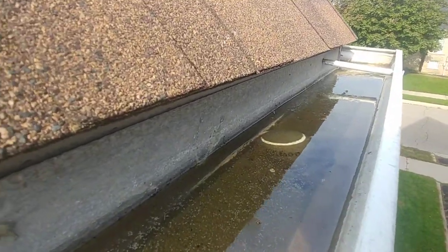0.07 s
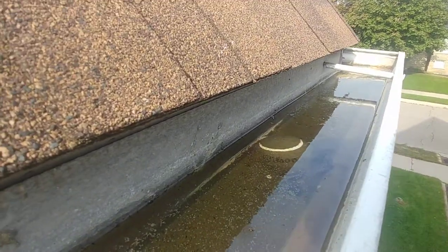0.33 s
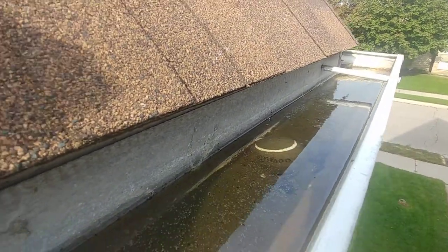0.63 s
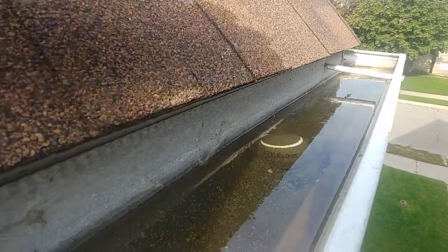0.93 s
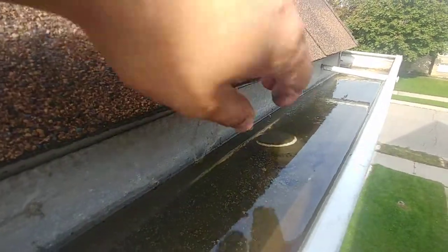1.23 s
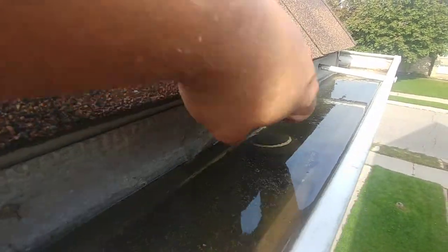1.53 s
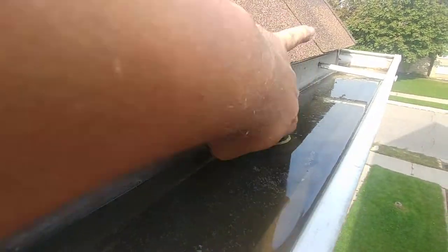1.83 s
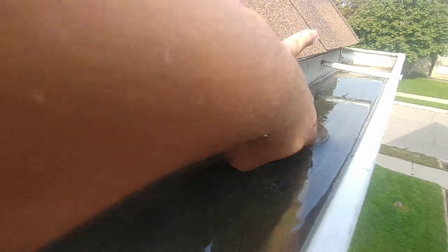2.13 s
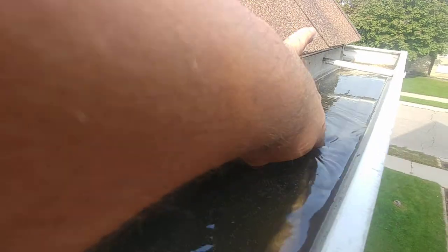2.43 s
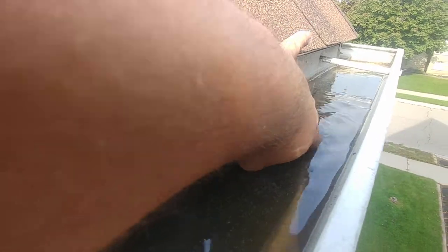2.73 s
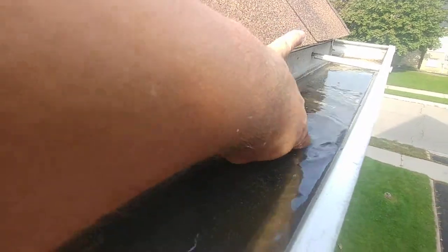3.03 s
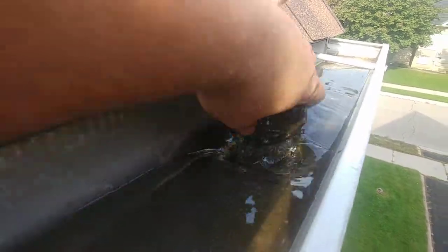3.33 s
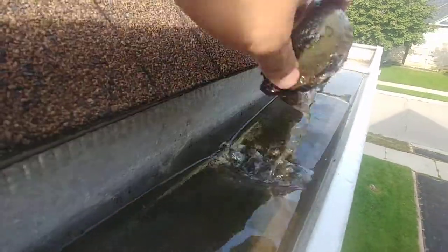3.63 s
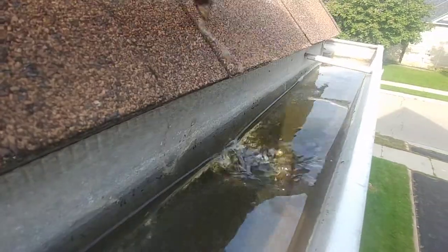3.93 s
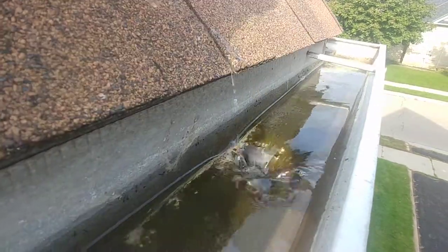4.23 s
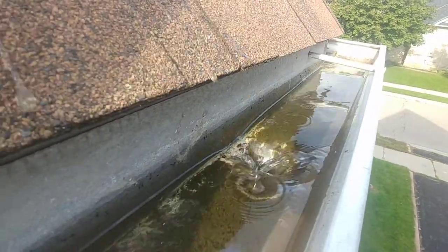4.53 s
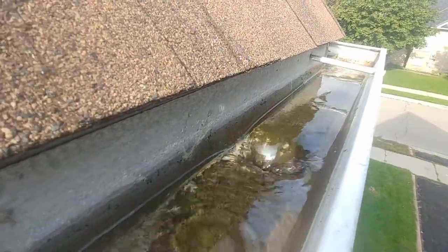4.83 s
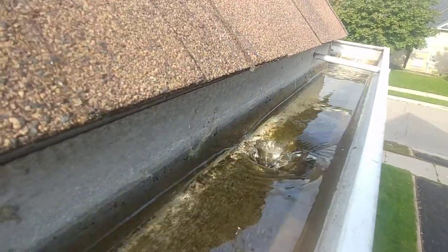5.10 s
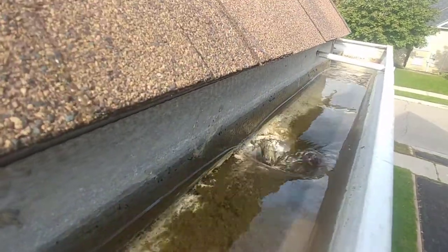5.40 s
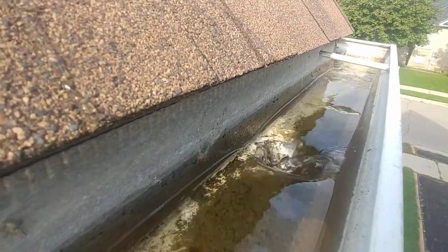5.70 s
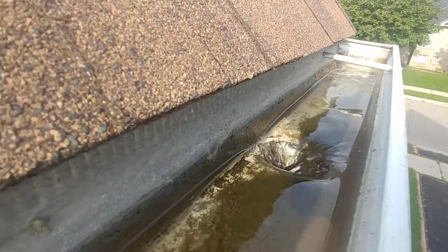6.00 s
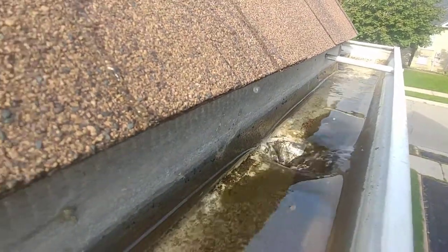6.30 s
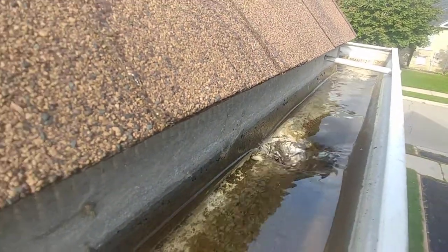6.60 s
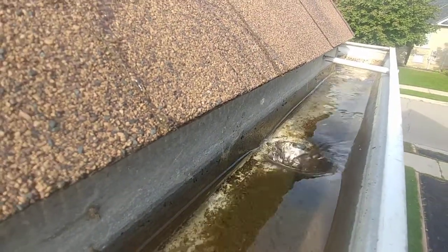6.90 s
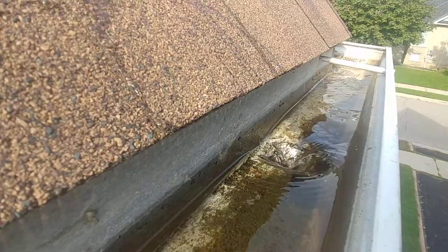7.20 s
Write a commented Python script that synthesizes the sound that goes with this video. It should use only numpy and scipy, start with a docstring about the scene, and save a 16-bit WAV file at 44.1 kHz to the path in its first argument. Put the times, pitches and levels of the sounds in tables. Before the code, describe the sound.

Outdoors on a roof, small engines drone faintly in the distance. Close by, a shirt rustles, an arm rubs over shingles and a knock rings the metal gutter. A hand softly stirs standing water, then pulls out a clump of leaves with a splash. Water rushes into the outlet, gurgling loudly with ringing bubbles, while the filling downpipe booms and thuds below.

```python
"""Small engines drone in the distance; a faint high shimmer flickers. On a roof, a shirt rustles as a bare
arm drags over the shingles into a flooded metal gutter; one knock rings the metal, the hand stirs water.
From 3.2 s a plug of leaves is pulled out of the outlet and water splashes off the clump. It then rushes
into the downpipe, gulping air in ringing bubbles; from about 5 s the full pipe booms and thuds below."""
import sys
import numpy as np
from scipy import signal
from scipy.fft import rfft, irfft, next_fast_len
from scipy.io import wavfile

SR = 44100
rng = np.random.default_rng(int(sys.argv[2]) if len(sys.argv) > 2 else 0)


def output_pcm(signal):
    """Save a mono or channel-first signal as 16-bit PCM at the path in sys.argv[1].

    Samples are clipped to [-1, 1] before scaling.
    """
    pcm = np.clip(np.atleast_2d(signal).T, -1, 1) * 32767
    wavfile.write(sys.argv[1], SR, np.round(pcm).astype(np.int16))


N = 324135
TIME_S = np.arange(N) / SR
OPEN_S, FULL_S = 3.9, 4.9  # outlet open, downpipe full

# stereo noise: f/Hz, left-right correlation
CORRELATION = [(60, 0.79), (300, 0.87), (700, 0.45), (1400, 0), (3000, 0.11), (16000, 0)]
# outdoor air: f/Hz, density/dB
AIR_SPECTRUM = [(25, -40), (45, -16), (70, 3), (110, -1.5), (160, -7), (300, -14.5), (600, -20.5),
                (1000, -24), (1600, -36), (3000, -42.5), (6000, -46.5), (7800, -48), (10000, -55),
                (15000, -51)]
# distant engine: t/s, firing rate/Hz, level/dB
ENGINE_RUN = [(0, 82.4, -39), (.3, 86.6, -37), (1, 87.65, -38.5), (1.8, 87.5, -38.5), (2.2, 88.5, -41),
              (3.1, 87.9, -43.5), (3.6, 88.5, -37), (5, 90, -46), (7.35, 88.3, -36.5)]
# its harmonics: order, level/dB
ENGINE_HARMONICS = [(1, -0.5), (2, -28.5), (6, -35.5), (7, -39)]
# second, rougher engine: t/s, firing rate/Hz, level/dB
ROUGH_RUN = [(0, 84.6, -74), (.6, 83.6, -58), (1.1, 83.9, -52.5), (1.7, 84.04, -57.5), (2.2, 82.8, -62),
             (2.9, 83.5, -58.5), (7.35, 83.95, -54)]
# its harmonics: order, level/dB
ROUGH_HARMONICS = [(2, -4.5), (3, -4), (4, -6), (5, -20)]
# pulses of the high shimmer: centre t/s, half length/s, boost/dB
SHIMMER_PULSES = [(.13, .08, 8), (.35, 0.082, 10), (.5, .05, 4), (.65, .05, 11), (2.08, .1, 12),
                  (2.38, .045, 16), (2.52, .05, 13), (2.67, .065, 12), (2.89, .06, 12)]
# soft low bumps: t/s, level/dB
SOFT_BUMPS = [(0.196, -28), (0.221, -35), (0.245, -35), (0.301, -41), (1.5, -41), (1.665, -40)]
# cloth sliding during the reach: t/s, level/dB
SHIRT_LEVEL = [(0.7, -80), (0.8, -58), (0.92, -49), (1.2, -46.5), (1.77, -49), (1.95, -60.5), (2.35, -67.5),
               (2.8, -86)]
# cloth hiss: f/Hz, density/dB
SHIRT_SPECTRUM = [(900, -23), (1500, -5), (2300, 6.5), (3000, 3.5), (3420, 7), (3900, 3.5), (6500, 6.5),
                  (8200, 5.5), (10300, -14), (12500, 0.5), (15500, 5.5)]
# cloth, brightest when fast: t/s, top octave/dB
SHIRT_TREBLE = [(.8, 8.5), (1.05, 4.5), (1.3, -1), (1.7, -8), (2.4, -5), (3, -2), (3.25, 13)]
# sleeve tugs: t/s, length/s, level/dB
SLEEVE_TUGS = [(1.483, 0.054, -57), (1.668, 0.03, -55), (2.052, 0.022, -66), (2.959, 0.026, -54.5),
               (3.023, 0.016, -61), (3.238, 0.032, -40.5), (3.297, 0.009, -63)]
# forearm on the shingle edge: t/s, level/dB
DRAG_LEVEL = [(1.1, -47), (1.4, -58), (1.7, -59), (2.05, -57), (2.3, -64.5), (2.7, -74), (3.15, -63.5)]
# its rub: f/Hz, density/dB
DRAG_SPECTRUM = [(400, 2), (750, 6.5), (1100, 2.5), (1650, 0), (2000, -1), (2210, 4.5), (2450, 1.5),
                 (3050, -19), (3420, -9), (3900, -16), (4500, -38)]
# contacts with the gutter: t/s, level/dB
GUTTER_KNOCKS = [(1.102, -31.5), (1.11, -34.5), (1.126, -40), (1.674, -68)]
# gutter sheet metal: f/Hz, level/dB, t60/s
METAL_MODES = [(252, -17, 0.4), (435, -13, 0.2), (522, -7.5, 0.32), (608, -9, 0.28), (764, -18, 0.3),
               (1109, -4.5, 0.34), (1140, -8, 0.28), (1308, -15, 0.24), (1631, -6, 0.15), (1965, -11, 0.4),
               (2390, -11, 0.2), (2724, -8, 0.13), (3290, -8.5, 0.14), (5400, -6, 0.12)]
# hand in standing water: t/s, length/s, level/dB
HAND_LAPS = [(1.655, 0.059, -51), (1.882, .08, -58), (2.023, .07, -60), (2.179, .075, -56),
             (2.327, .05, -54), (2.569, 0.063, -58), (2.698, 0.067, -59)]
# faint high chirps: t/s, f/Hz, length/s, level/dB
HIGH_CHIRPS = [(1.659, 6270, 0.044, -49), (2.256, 6220, 0.14, -70), (2.662, 6260, 0.098, -80),
               (2.965, 6170, 0.11, -63.5), (3.01, 5400, 0.047, -59)]
# flow into the outlet as the plug lifts: t/s, level/dB, spray re flow/dB
OUTLET_FLOW = [(3.17, -67, -15), (3.23, -45.5, 1), (3.33, -51.5, -3), (3.36, -36, -12), (3.385, -38, 5),
               (3.47, -32, -0.5), (3.55, -31.5, -4), (3.61, -32, 4.5), (3.73, -25.5, -5), (3.88, -29.5, -4),
               (4.4, -29, -3), (4.73, -32, -2), (4.97, -25, -4.5), (5.5, -24, -5.5), (6.1, -27, -5),
               (6.66, -29.5, -2), (7.35, -29, -4.5)]
# outlet swallows a slug: centre t/s, half length/s, flow change/dB
FLOW_SURGES = [(4.58, 0.041, 6), (4.65, 0.03, 8), (4.838, 0.11, 5), (5.462, 0.034, 3.5),
               (5.54, 0.022, -1.5), (5.85, 0.011, 2.5), (6.39, 0.18, 2), (6.886, 0.029, 3.5),
               (6.97, 0.028, 3), (7.193, 0.092, 3.5)]
# spray dulls as the water sinks: t/s, top octave/dB
SPRAY_TREBLE = [(3.3, 0.5), (4.8, 1.5), (5.5, 0.5), (6.6, -2.5), (7.35, -5)]
# trough hollows, plus treble peaks and dips: f/Hz, width/Hz, left/dB, right/dB
TROUGH_BANDS = [(650, 1000, 4, -2), (1018, 140, 0.5, 4.5), (1510, 920, -7, 1.5), (2040, 560, 2.5, 3),
                (2606, 99, 4, -4.5), (4050, 1050, 3.5, -5), (7970, 1000, 6, 8), (10580, 1610, -40.5, -15),
                (13900, 9300, -2.5, -4)]
# downpipe rumble: f/Hz, density/dB
RUMBLE_SPECTRUM = [(35, -80), (55, -8), (75, -7.5), (130, 4.5), (200, -0.5), (300, -3.5), (420, -0.5),
                   (700, -41)]
# water off the lifted clump: t/s, level/dB
POUR_LEVEL = [(3.2, -47.5), (3.4, -46), (3.7, -36), (4.55, -47), (5.2, -59)]
# air pockets changing size: t/s, length/s, start f/Hz, end f/Hz, level/dB
AIR_BLOOPS = [(3.215, 0.041, 1057, 1130, -27), (3.253, 0.051, 1136, 1195, -30.5),
              (3.309, 0.05, 457, 780, -33), (3.441, 0.047, 460, 690, -27), (3.968, 0.051, 860, 1230, -13.5),
              (4.18, 0.049, 506, 546, -24), (4.347, 0.043, 698, 784, -19), (4.522, 0.06, 926, 1060, -18),
              (4.608, 0.056, 289, 315, -22), (4.75, 0.05, 567, 650, -17.5), (4.812, 0.12, 676, 952, -19),
              (5.093, 0.051, 560, 650, -18), (5.34, 0.037, 601, 623, -12.5), (5.966, 0.06, 778, 588, -17),
              (6.693, .045, 1284, 1020, -23), (6.923, 0.032, 980, 540, -17.5),
              (7.133, 0.062, 918, 650, -12.5)]
# main gulps of air, glugs to plinks: t/s, f/Hz, level/dB
MAIN_GULPS = [(3.242, 1080, -31), (3.268, 3600, -30), (3.342, 2240, -29), (3.357, 2290, -29),
              (3.467, 900, -22), (3.56, 1740, -3.5), (3.561, 1510, -7), (3.915, 453, -20),
              (4.163, 2250, -13), (4.173, 478, -12.5), (4.299, 1710, -15.5), (4.389, 752, -10),
              (4.4166, 4250, -17), (4.465, 2147, -8.5), (4.465, 595, -14.5), (4.482, 4050, -12),
              (4.532, 3020, -7.5), (4.559, 953, -12.5), (4.58, 2900, -12), (4.608, 2790, -10.5),
              (4.657, 421, -13.5), (4.721, 1440, -9.5), (4.812, 681, -11), (4.888, 924, -9),
              (4.9, 4300, -13), (4.924, 1850, -3.5), (4.929, 1960, -4.5), (4.972, 4950, -17),
              (5.045, 2550, -10), (5.084, 493, -11.5), (5.148, 3900, -12), (5.162, 4350, -12),
              (5.21, 4020, -11.5), (5.214, 780, 0), (5.234, 555, -8), (5.265, 4260, -12), (5.316, 1900, -7),
              (5.337, 618, 0), (5.337, 1260, -4), (5.417, 555, -9), (5.426, 4100, -7), (5.575, 2230, -9),
              (5.601, 2950, -17), (5.647, 4100, -9), (5.676, 3880, -9.5), (5.683, 2150, -6),
              (5.74, 4200, -11), (5.772, 1790, -9.5), (5.817, 590, -8.5), (5.849, 1007, -10.5),
              (5.851, 3030, -10.5), (5.854, 5100, -13), (5.863, 1920, -8), (6.0, 680, -12.5),
              (6.02, 2180, -4.5), (6.023, 4930, -8.5), (6.052, 2720, -9), (6.064, 5120, -13.5),
              (6.088, 694, -9), (6.168, 1058, -8), (6.222, 2050, -8), (6.231, 2900, -22),
              (6.267, 5160, -17), (6.275, 2200, -9), (6.292, 4020, -11), (6.304, 2410, -8),
              (6.344, 1996, -11), (6.345, 716, -4.5), (6.365, 3180, -14), (6.385, 2850, -11),
              (6.404, 2350, -12.5), (6.446, 4900, -14), (6.457, 4060, -9), (6.519, 736, -8.5),
              (6.596, 2130, -11.5), (6.655, 2800, -10.5), (6.765, 724, -16.5), (6.790, 755, -2.5),
              (6.851, 925, -12.5), (6.865, 2090, -8), (6.88, 2370, -10.5), (6.992, 2560, -13.5),
              (7.053, 665, -9.5), (7.092, 2530, -14.5), (7.159, 750, -3.5), (7.182, 2860, -11),
              (7.216, 2550, -2), (7.228, 2490, -2.5), (7.31, 4030, -11.5)]
# downpipe fills and booms: t/s, level/dB
BOOM_LEVEL = [(3.3, -56), (4.4, -44), (4.85, -54), (5.1, -32), (5.5, -30), (5.9, -30.5), (6.4, -32.5),
              (6.6, -41), (7.1, -40), (7.35, -42)]
# its air column: f/Hz, density/dB
BOOM_SPECTRUM = [(35, -35), (52, -19), (72, 15), (100, 16), (135, -0.5), (200, -35)]
# bursting bubble skins: t/s, f/Hz, level/dB, left minus right/dB
SKIN_SNAPS = [(3.3775, 3400, -19, 0), (3.8842, 7400, -2, 1), (4.4672, 2100, -2.5, 5), (4.645, 3520, -3, -2),
              (5.2322, 6700, -3, -16), (5.8639, 1870, -2, 2)]
# water on water: t/s, slap/dB, spray/dB
WATER_SLAPS = [(3.383, -38, -14), (3.389, -32, -6.5), (3.402, -30, -6), (3.459, -19.5, -21),
               (3.559, -9, -12), (3.576, -15.5, -3.5), (4.185, -15.5, -4.5), (4.466, -13.5, -19),
               (4.787, -8.5, 0.5), (4.857, -7, -13), (4.924, -12, -24), (5.335, -18, -8),
               (5.697, -37, -2.5), (5.862, -9.5, -24), (6.342, -7.5, -11), (6.571, -11.5, -4),
               (6.866, -23, -7), (7.181, -12.5, -28), (7.228, -16, -9)]
# slugs striking the pipe bend: t/s, level/dB
BEND_THUDS = [(4.955, -29), (5.03, -20), (5.083, -23), (5.378, -22), (5.415, -32), (5.512, -20),
              (5.584, -25.5), (6.774, -27), (6.86, -28), (7.055, -28)]


def from_db(db):
    """Decibels to gain."""
    return 10 ** (np.asarray(db) / 20)


def unit_rms(x):
    """Scale to rms 1."""
    return x / np.sqrt(np.mean(x ** 2) + 1e-20)


def in_time(rows, before=None):
    """Each column of a curve at every sample."""
    times_s, *columns = np.transpose(rows)
    return [np.interp(TIME_S, times_s, column, left=before) for column in columns]


def at_hz(points, hz):
    """Interpolate on a log frequency axis."""
    points_hz, values = np.transpose(points)
    return np.interp(np.log(hz + 1), np.log(points_hz), values)


def swells_db(rows):
    """Sum of Gaussian humps at every sample."""
    return sum(db * np.exp(-((TIME_S - at_s) / half_s) ** 2) for at_s, half_s, db in rows)


def pan(db):
    """Stereo gains for a left-minus-right level."""
    return unit_rms(from_db(np.array([[db], [-db]]) / 2))


def band(x, low_hz, high_hz):
    """Butterworth band-pass."""
    sos = signal.butter(2, [low_hz, min(high_hz, .47 * SR)], "band", fs=SR, output="sos")
    return signal.sosfilt(sos, x + 1e-18)


def brighten(x, curve):
    """Shelve the top octave along a curve."""
    top_db, = in_time(curve)
    top = signal.sosfiltfilt(signal.butter(2, 10000, "high", fs=SR, output="sos"), x)
    return x + (from_db(top_db) - 1) * top


def drift(rate_hz):
    """Slow random wander, rms 1."""
    hop = 40
    pole = np.exp(-2 * np.pi * rate_hz * hop / SR)
    slow = signal.lfilter([1], [1, -2 * pole, pole * pole], rng.standard_normal(N // hop + 2002))[2000:]
    return np.interp(np.arange(N) / hop, np.arange(len(slow)), unit_rms(slow))


def add(out, at_s, sound):
    """Mix a sound in at a time."""
    i = int(np.clip(at_s * SR, 0, N - 1))
    out[..., i:i + sound.shape[-1]] += sound[..., :N - i]


def noise(spectrum):
    """Coloured stereo noise, correlated in the bass; rms 1."""
    size = next_fast_len(N)
    hz = np.arange(size // 2 + 1) * SR / size
    mid, side = rfft(rng.standard_normal((2, size)))
    alike = at_hz(CORRELATION, hz)
    stereo = np.sqrt(1 + alike) * mid + np.sqrt(1 - alike) * side * [[1], [-1]]
    coloured = stereo * from_db(at_hz(spectrum, hz)) * hz / (hz + 10)
    return unit_rms(irfft(coloured, size)[:, :N])


def burst(low_hz, high_hz, t60_s, onset_s=.00045):
    """Decaying stereo noise puff; long waves reach both ears alike."""
    t = TIME_S[:SR // 4]
    left, right = rng.standard_normal((2, len(t)))
    right = right + signal.lfilter(*signal.butter(1, 1300, fs=SR), left - right)
    envelope = (1 - np.exp(-t / onset_s)) * from_db(-60 * t / t60_s)
    return unit_rms(band(np.array([left, right]), low_hz, high_hz)) * envelope


def engine(run, harmonics):
    """Only low firing orders carry this far, each wavering on the air."""
    firing_hz, level_db = in_time(run)
    phase = 2 * np.pi * np.cumsum(firing_hz * (1 + .0045 * drift(6.6))) / SR
    drone = np.zeros(N)
    for order, db in harmonics:
        waver_db = (1.2 if order == 1 else 2.5) * drift(2.4)
        drone += from_db(db + waver_db) * np.sin(order * phase)
    return np.sqrt(2) * from_db(level_db) * drone * pan(3.9)


def shimmer(centre_hz=8000, width_hz=590, wander_hz=150):
    """Faint, thin, high noise band, flickering in short uneven pulses."""
    low_pass = signal.butter(3, width_hz / 2, fs=SR, output="sos")
    baseband = signal.sosfilt(low_pass, rng.standard_normal((2, 2, N)))
    phase = 2 * np.pi * np.cumsum(centre_hz + wander_hz * drift(4)) / SR
    hiss = unit_rms(baseband[0] * np.cos(phase) + baseband[1] * np.sin(phase))
    return from_db(-79.5 + swells_db(SHIMMER_PULSES) + 1.5 * drift(14)) * hiss * pan(-1)


def bumps():
    """Soft low thuds, no ring."""
    out = np.zeros((2, N))
    for at_s, level_db in SOFT_BUMPS:
        thud = burst(86, 202, t60_s=.16) * pan(4.1) + from_db(-23) * burst(380, 1100, t60_s=.12)
        add(out, at_s, from_db(level_db) * thud)
    return out


def shirt():
    """Hiss of sliding cloth, duller as it slows."""
    level_db, = in_time(SHIRT_LEVEL, before=-120)
    gain = (from_db(level_db) + tug_gain()) * from_db(2.5 + .95 * drift(30))
    return gain * brighten(noise(SHIRT_SPECTRUM), SHIRT_TREBLE) * pan(3.3)


def tug_gain(attack_s=.013, release_s=.008):
    """Each sleeve tug swells, holds and dies away."""
    gain = np.zeros(N)
    for at_s, length_s, level_db in SLEEVE_TUGS:
        rise = np.minimum(TIME_S - at_s, 0) / attack_s
        fall = np.maximum(TIME_S - at_s - length_s, 0) / release_s
        gain += from_db(level_db) * np.exp(rise - fall)
    return gain


def forearm():
    """Skin on grit: a dull, uneven rub. Each tug also drags the arm."""
    level_db, = in_time(DRAG_LEVEL, before=-120)
    gain = from_db(level_db) + from_db(-1) * tug_gain()
    return gain * from_db(2 * drift(25)) * noise(DRAG_SPECTRUM)


def knocks():
    """Each contact cracks and rings the sheet metal."""
    out, t = np.zeros((2, N)), TIME_S[:SR // 2]
    for at_s, level_db in GUTTER_KNOCKS:
        ring = np.zeros((2, len(t)))
        for hz, mode_db, t60_s in METAL_MODES:
            decay = from_db(mode_db + rng.uniform(-3, 3, (2, 1)) - 60 * t / t60_s)
            ring += decay * np.sin(2 * np.pi * hz * t) * rng.choice([-1, 1])
        crack = from_db(.5) * burst(1120, 3100, t60_s=.16)
        crack += from_db(-3.5) * burst(5500, 6700, t60_s=.055)
        add(out, at_s, from_db(level_db - 4.5) * ring)
        add(out, at_s, from_db(level_db) * crack)
    return out


def laps():
    """Small waves swell against the wrist and fade."""
    out = np.zeros((2, N))
    for at_s, length_s, level_db in HAND_LAPS:
        size = int(length_s * SR)
        wash = unit_rms(band(rng.standard_normal(SR // 2), 570, 830))[:size]
        add(out, at_s, from_db(level_db) * wash * np.hanning(size))
    return out


def chirps(pip_rate_hz=75, sweep_hz=300):
    """Thin trills: rapid trains of falling pips."""
    out = np.zeros((2, N))
    for at_s, hz, length_s, level_db in HIGH_CHIRPS:
        size = int(length_s * SR)
        cycle = pip_rate_hz * TIME_S[:size] % 1
        phase = 2 * np.pi * np.cumsum(hz + sweep_hz * (.5 - cycle)) / SR
        pips = np.sin(np.pi * cycle) ** 4 * np.sin(phase)
        blur = unit_rms(band(rng.standard_normal((2, SR // 2)), hz * .96, hz * 1.04))[:, :size]
        add(out, at_s, from_db(level_db + 10) * (pips + from_db(-12) * blur) * np.hanning(size))
    return out


def flow_levels_db():
    """Surging flow, its low band (grows until the pipe is full), spray re flow."""
    flow_db, spray_db = in_time(OUTLET_FLOW, before=-120)
    flow_db += swells_db(FLOW_SURGES)
    low_db = flow_db + np.interp(TIME_S, [OPEN_S, FULL_S], [-2, 0])
    return flow_db, low_db, spray_db


def bubble(hz, t60_s, rise):
    """Trapped air pinches off, rings, and climbs in pitch as it nears the surface."""
    t = np.arange(int(t60_s * SR) + 2) / SR
    pinch_off = 1 - np.exp(-(t * hz / 1.7) ** 2)
    phase = 2 * np.pi * hz * t * (1 + rise * t / (2 * t60_s))
    return pinch_off * from_db(-60 * t / t60_s) * np.sin(phase)


def swarm(count, low_hz, high_hz, cycles, size_db, spread_db, rise, start_s=3.1):
    """Random air pockets each break into four like bubbles; rms 1 while water runs."""
    out = np.zeros((2, N))
    pockets = np.repeat(rng.random((count // 4, 5)), 4, axis=0)
    for when, pitch, size, place, lag in pockets:
        delay, detune, life, climb = rng.random(4)
        hz = low_hz * (high_hz / low_hz) ** pitch * 2 ** (.4 * (detune - .5))
        level_db = size_db * min(-np.log(size + 1e-9), 3)
        t60_s = cycles * 2 ** (2 * life - 1) / hz
        ring = from_db(level_db) * bubble(hz, t60_s, rise * climb)
        left, right = pan(spread_db * (2 * place - 1))
        at_s = start_s + when * (N / SR - start_s) + .016 * delay
        add(out[0], at_s, left * ring)
        add(out[1], at_s + .00017 * (2 * lag - 1), right * ring)
    return unit_rms(out) * np.sqrt(1 - start_s * SR / N)


def running_water():
    """Three sizes of bubbles, each over a churning wash; surges as the outlet swallows air."""
    flow_db, low_db, spray_db = flow_levels_db()
    surge = drift(26)
    large = swarm(count=1600, low_hz=560, high_hz=1200, cycles=24, size_db=2, spread_db=3, rise=.25)
    small = swarm(count=4400, low_hz=1400, high_hz=5000, cycles=27, size_db=2.7, spread_db=9, rise=.12)
    fizz = swarm(count=4000, low_hz=5095, high_hz=15040, cycles=26, size_db=2.4, spread_db=15, rise=.08)
    # f/Hz, density/dB
    low_wash = noise([(250, -22), (480, -3.5), (680, -4.5), (1100, -6.5), (1900, -23)])
    mid_wash = noise([(750, -17.5), (1250, 1.5), (2200, -4), (4400, -8.5), (7000, -30)])
    high_wash = noise([(2900, -17), (4600, -7), (8000, -8), (15500, -11.5)])
    churn = from_db(-3) * large + from_db(-2) * low_wash
    babble = from_db(-.5) * small + from_db(-1) * mid_wash
    spray = brighten(from_db(1.5) * fizz + from_db(5) * high_wash, SPRAY_TREBLE)
    return (churn * from_db(low_db - 2.5 + .37 * surge + drift(45))
            + babble * from_db(flow_db + 2.3 * surge)
            + spray * from_db(flow_db + spray_db + 1.7 * surge))


def trough_filters():
    """One peaking section per band, per side."""
    hz, width_hz, *sides_db = np.transpose(TROUGH_BANDS)
    alpha = np.tan(np.pi * width_hz / SR)
    a1 = -2 * np.cos(2 * np.pi * hz / SR)
    sides = [np.transpose([1 + alpha * g, a1, 1 - alpha * g, 1 + alpha / g, a1, 1 - alpha / g])
             for g in from_db(np.array(sides_db) / 2)]
    return [np.ascontiguousarray(sos / sos[:, [3]]) for sos in sides]


def trough_gain(hz):
    """Filter gain at one pitch, rms of both sides."""
    z = np.exp(-2j * np.pi * hz / SR) ** np.arange(3)
    gains = [abs(np.prod((sos[:, :3] @ z) / (sos[:, 3:] @ z))) for sos in trough_filters()]
    return np.sqrt(np.mean(np.square(gains)))


def trough(x, echo_db, t60_s):
    """Sound rattles between gutter walls and roof and takes on their hollows, plus a few treble peaks and dips."""
    echoes = burst(385, 17000, t60_s) * (TIME_S[:SR // 4] > .0012)
    echoes /= np.sqrt(np.sum(echoes ** 2, axis=1, keepdims=True))
    x = x + from_db(echo_db) * signal.fftconvolve(x, echoes, axes=1)[:, :N]
    return np.array([signal.sosfilt(sos, side + 1e-18) for sos, side in zip(trough_filters(), x)])


def pipe_rumble():
    """The downpipe rumbles with the flow."""
    _, low_db, _ = flow_levels_db()
    return noise(RUMBLE_SPECTRUM) * from_db(low_db - 8 + 2.1 * drift(18)) * pan(3.7)


def pour():
    """A thin stream off the clump drags big, deep bubbles into the standing water."""
    level_db, = in_time(POUR_LEVEL, before=-120)
    bubbles = swarm(count=800, low_hz=350, high_hz=560, cycles=14, size_db=3, spread_db=0, rise=.24)
    return from_db(level_db) * bubbles * pan(9.9)


def bloops():
    """A large air pocket stretches or squeezes: it swells, glides and flutters amid froth."""
    out = np.zeros((2, N))
    flutter = from_db(2 * drift(58))
    waver = 1 + .036 * drift(53)
    for at_s, length_s, start_hz, end_hz, level_db in AIR_BLOOPS:
        age = np.linspace(0, 1, int(length_s * SR))
        span = int(at_s * SR) + np.arange(len(age))
        hz = (start_hz + (end_hz - start_hz) * age) * waver[span]
        tone = np.sin(2 * np.pi * np.cumsum(hz) / SR)
        froth = unit_rms(band(rng.standard_normal(SR // 2), start_hz * .75, end_hz * 1.5))[:len(age)]
        swell = np.sin(np.pi * age ** 1.5) * flutter[span]
        gain = from_db(level_db - 4.5) / trough_gain((start_hz + end_hz) / 2)
        add(out, at_s, gain * swell * (tone + from_db(-7) * froth))
    return out


def gulps():
    """One bubble amid spatter and splinter bubbles; larger ones ring longer."""
    out = np.zeros((2, N))
    for at_s, hz, level_db in list(MAIN_GULPS) + lesser_gulps():
        t60_s = .036 * (hz / 1000) ** -.46
        gain = from_db(level_db + .5) / trough_gain(hz)
        spatter = from_db(-9) * burst(hz * .85, hz * 1.6, t60_s, onset_s=.003)
        add(out, at_s, gain * bubble(hz, t60_s, rise=rng.uniform(0, .15)))
        add(out, at_s, gain * spatter)
        for delay, detune, place in rng.uniform(-1, 1, size=(5, 3)):
            splinter_hz = hz * 2 ** (.478 * (detune + .5))
            splinter = from_db(-11.5) * bubble(splinter_hz, t60_s / 2, rise=.095)
            add(out, at_s + .016 * (delay + .75), gain * splinter * pan(6 * place))
    return out


def lesser_gulps(per_s=12, low_hz=750, high_hz=4930, over_flow_db=5):
    """Random gulps once the pipe is full: t/s, f/Hz, level/dB."""
    flow_db, _, _ = flow_levels_db()
    when, pitch, size = rng.random((int(per_s * (N / SR - FULL_S)), 3)).T
    at_s = FULL_S + (np.arange(len(when)) + when) / per_s
    level_db = np.interp(at_s, TIME_S, flow_db) + over_flow_db + (2 * size - 1)
    return list(zip(at_s, low_hz * (high_hz / low_hz) ** pitch, level_db))


def pipe_boom():
    """Falling slugs of water make the air column boom unevenly."""
    level_db, = in_time(BOOM_LEVEL, before=-120)
    return from_db(level_db + .76 * drift(13)) * noise(BOOM_SPECTRUM) * pan(2.5)


def snaps(t60_cycles=17):
    """A bubble skin bursts: instant onset, brief ring."""
    out, t = np.zeros((2, N)), TIME_S[:SR // 4]
    for at_s, hz, level_db, side_db in SKIN_SNAPS:
        ring = np.sin(2 * np.pi * hz * t) * from_db(-60 * t * hz / t60_cycles)
        crack = from_db(-16) * burst(1500, 12600, t60_s=.0058, onset_s=.0001)
        add(out, at_s, from_db(level_db) * (ring + crack) * pan(side_db))
    return out


def slaps():
    """Falling water and bursting air pockets: a slap and a short bright spray."""
    out = np.zeros((2, N))
    for at_s, slap_db, spray_db in WATER_SLAPS:
        add(out, at_s, from_db(slap_db - .5) * burst(750, 3150, t60_s=.07, onset_s=.001))
        add(out, at_s, from_db(spray_db + 1.5) * burst(2800, .47 * SR, t60_s=.024, onset_s=.001))
    return out


def pipe_thuds():
    """Slugs of water thump into the bend of the downpipe."""
    out = np.zeros((2, N))
    for at_s, level_db in BEND_THUDS:
        add(out, at_s, from_db(level_db) * burst(80, 233, t60_s=.15, onset_s=.002))
    return out * pan(3)


def scene():
    """Sum of gutter, downpipe, person and background."""
    water = running_water()
    rumble = pipe_rumble()
    gutter = trough(water + gulps() + bloops() + slaps(), echo_db=-12.5, t60_s=.23)
    gutter += snaps() + laps() + pour() + knocks() + bumps()
    pipe = rumble + pipe_boom() + pipe_thuds()
    engines = engine(ENGINE_RUN, ENGINE_HARMONICS) + engine(ROUGH_RUN, ROUGH_HARMONICS)
    background = engines + chirps() + shimmer() + from_db(-47) * noise(AIR_SPECTRUM) * pan(2)
    return gutter + pipe + shirt() + forearm() + background


def record(dry):
    """Soft-clip the peaks, low-pass at 15.9 kHz."""
    low_pass = signal.ellip(12, .1, 70, 15900, fs=SR, output="sos")
    return signal.sosfilt(low_pass, 1.3 * np.tanh(dry / 1.3))


dry = scene()
out = record(dry)
output_pcm(out)
```